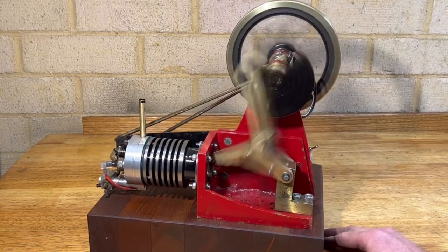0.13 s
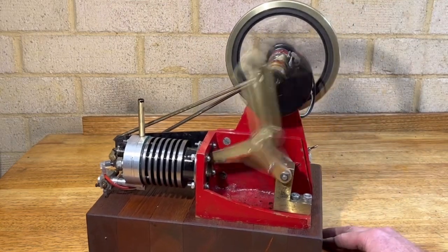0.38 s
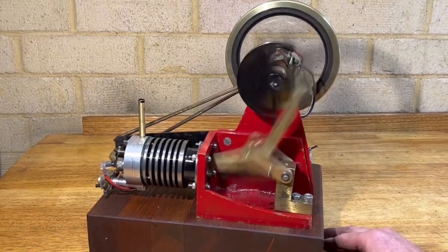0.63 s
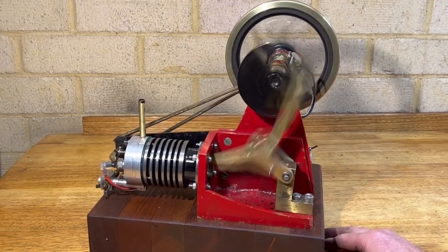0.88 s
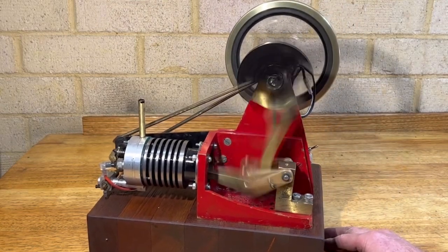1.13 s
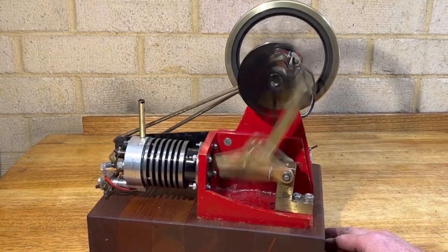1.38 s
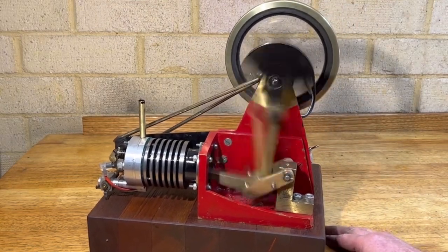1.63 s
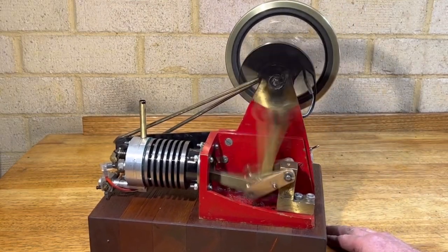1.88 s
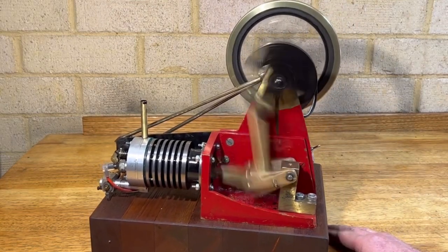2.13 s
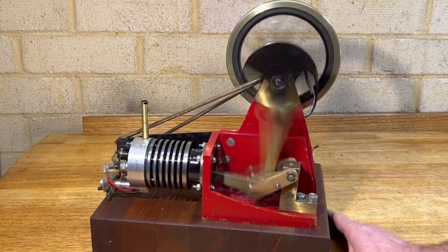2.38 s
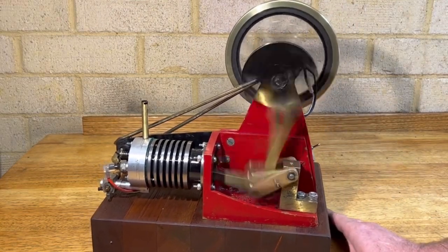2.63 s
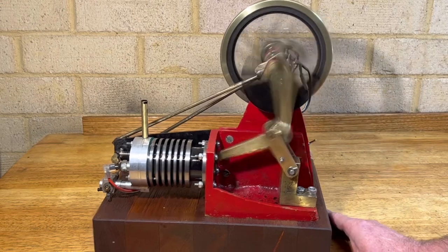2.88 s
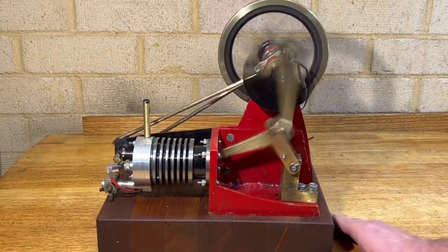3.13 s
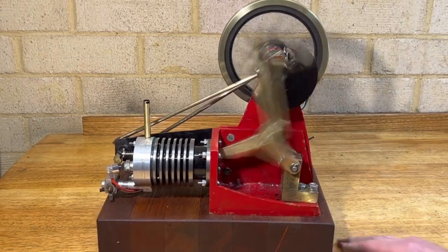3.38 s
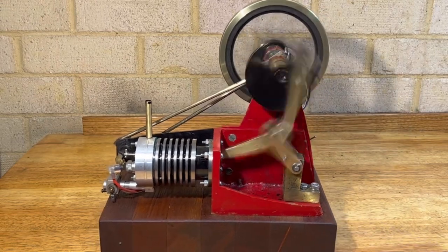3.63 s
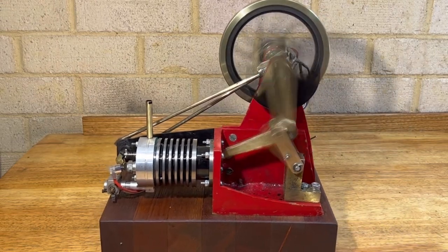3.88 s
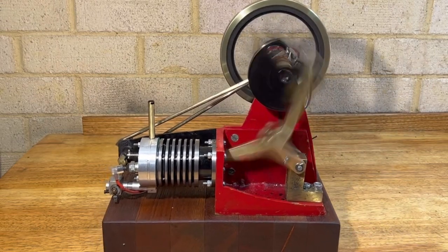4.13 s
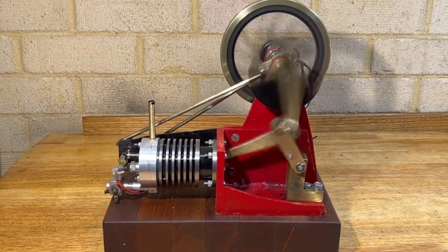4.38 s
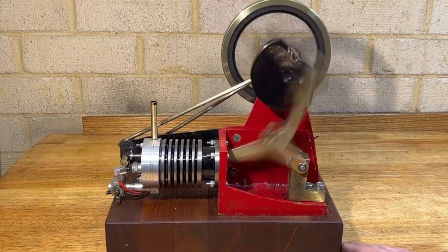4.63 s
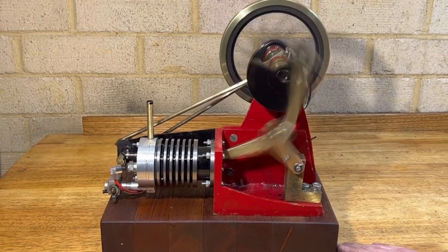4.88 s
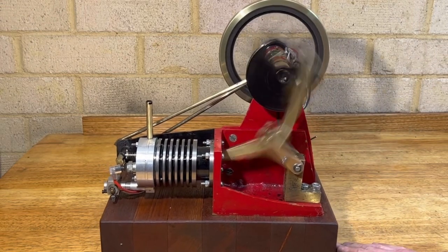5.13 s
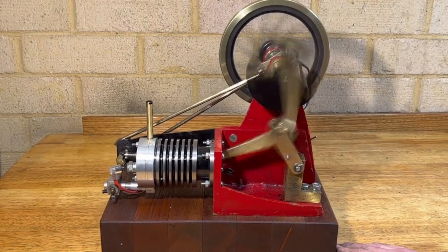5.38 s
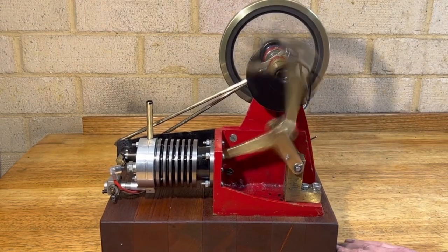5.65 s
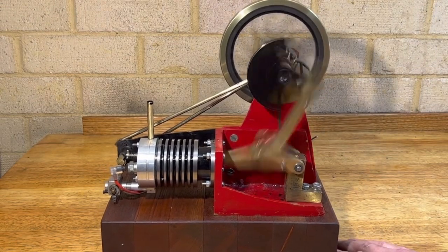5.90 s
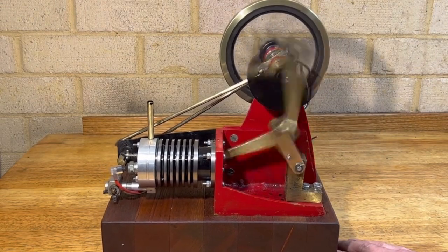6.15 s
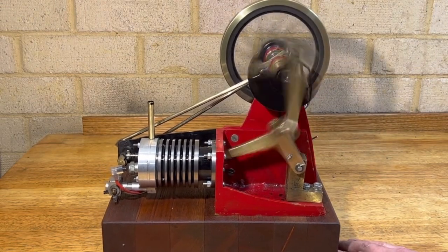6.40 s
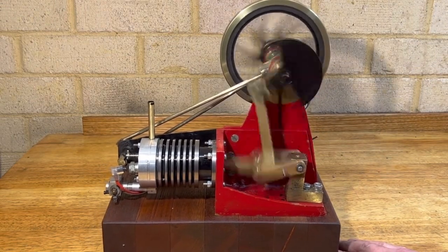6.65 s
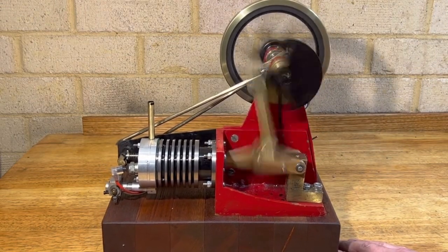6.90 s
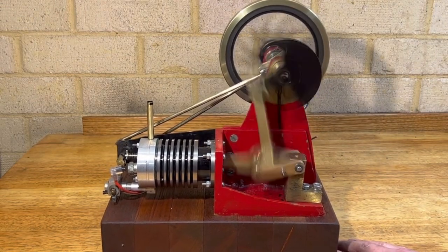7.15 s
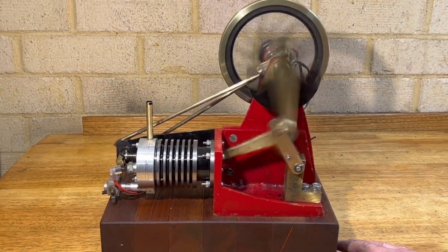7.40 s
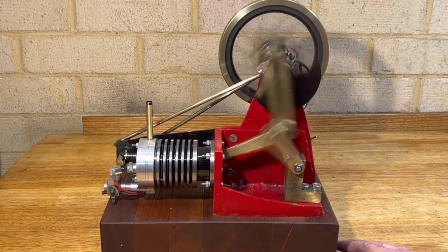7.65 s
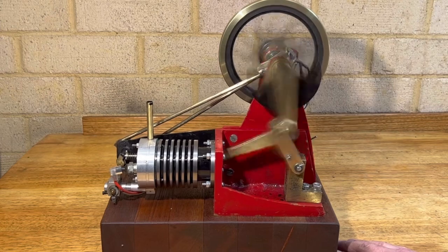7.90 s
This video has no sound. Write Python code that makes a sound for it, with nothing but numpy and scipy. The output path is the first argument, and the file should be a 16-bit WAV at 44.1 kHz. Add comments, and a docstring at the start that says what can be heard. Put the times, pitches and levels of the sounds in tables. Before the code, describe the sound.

Fast, slightly uneven clatter of a little metal engine on a wooden block: knock, tick, hiss, thud, clack, over a low bearing rumble.

```python
"""A small open-crank engine runs at about four cycles a second on a wooden block on a bench.
Each cycle starts with a rattling knock that thuds into the block; then a valve ticks open and gas hisses,
a heavy thud comes with a rush of gas, and the valve gear clacks brightly. Next the linkage knocks on its
return, a second valve ticks and hisses, and a last clack follows. Bearings rumble and the bench hums
throughout; the hum sinks until about 3 s, then partly comes back. Knocks, ticks and hiss are shaped noise."""
import sys
import numpy as np
from scipy import signal
from scipy.fft import rfft, irfft, next_fast_len
from scipy.io import wavfile

SR = 44100
rng = np.random.default_rng(int(sys.argv[2]) if len(sys.argv) > 2 else 0)


def to_linear_factor(level_db):
    """Convert decibel levels (scalar or array-like) to linear amplitude factors."""
    exponent = np.asarray(level_db, float) / 20
    return 10 ** exponent


def generate_wav(sig):
    """Save sig (samples, or channels by samples) to the path in sys.argv[1] as 16-bit PCM at SR."""
    pcm = np.round(np.clip(np.atleast_2d(sig).T, -1, 1) * 32767).astype(np.int16)
    wavfile.write(sys.argv[1], SR, pcm)


N = 353661   # length in samples
SIZE = next_fast_len(N + SR)   # spectrum length, with spare room for tails
HZ = np.fft.rfftfreq(SIZE, 1 / SR) + 1e-3   # just above zero, so that its logarithm exists

# The piston turns round twice a cycle; how hard each stroke works, against the mean:
# (t/s of the turn, thud level/dB, rattle level/dB)
STROKES = [(0.0068, -1, -0.5), (0.141, 2, 2), (0.2494, 2, 0), (0.3709, 3, 1.5), (0.4765, 0.5, 0.5),
           (0.5934, -0.0, 1.0), (0.7058, 1, 2), (0.8339, 0.5, 2.5), (0.9438, -1, 1.5), (1.0683, 0.5, 4.5),
           (1.1888, 0, 0), (1.326, -1, 1.5), (1.4393, 0.5, 1.5), (1.568, 1, 0.5), (1.6749, -2.5, 3),
           (1.7983, -0.5, -0.5), (1.9161, 0.5, 1.5), (2.0527, -1, 1.0), (2.1673, -1, 1.0), (2.2957, 0.5, 0),
           (2.4194, -3.5, 2), (2.5602, 0, -1), (2.6926, -1.5, -4), (2.85, -0.5, -1.5), (2.9763, -1, 3),
           (3.1145, -0.0, -0.5), (3.236, 0.5, -1.5), (3.3705, 0.5, 1), (3.4814, 2, -0.0),
           (3.6065, -1.5, -0.5), (3.7241, 1, -0.5), (3.863, 0.5, 1), (3.973, 1, 0.0), (4.0984, 1.5, -1.5),
           (4.2193, 1, 1), (4.3525, 0.5, 1), (4.4687, 3, 0.5), (4.6008, 1, 2), (4.7115, 2.5, 0.0),
           (4.841, 3.5, -0.5), (4.9611, 0.5, 0.5), (5.1, 0.0, 1), (5.2177, 1.5, 0.5), (5.348, 0, 1.5),
           (5.4717, 0.5, -1.0), (5.6123, 2, 1.5), (5.7278, 2.5, 0.5), (5.8567, 6, 0.5), (5.9785, 0, 0.5),
           (6.1157, -1.0, -0.5), (6.2382, -1.5, 0.5), (6.3799, 3, 0.5), (6.5097, 0, -3.0),
           (6.6636, -0.5, -1.5), (6.7838, 0.5, -0.5), (6.9232, -1.5, 2.5), (7.0326, -0.0, 0.5),
           (7.1595, 2, 1.5), (7.269, 0, 0), (7.3947, 2, 0.5), (7.504, -0.5, 0.5), (7.6313, 2.5, -1),
           (7.7537, -0.5, -1), (7.8931, 2, 0.5), (8.0095, 3, 0.5), (8.1249, 0.0, 0.0)]


def every_cycle(contact, column):
    """Times and levels of one contact: the crank passes its angle once a cycle, evenly within a stroke."""
    valve_db_per_percent = 0.17   # valve gear and gas grow louder with speed, per percent above the mean
    lead_deg = 20   # slack taken up this close before a turning point belongs to the coming stroke
    uneven_db = 1.13   # chance spread from one contact to the next
    turn_s, thud_db, rattle_db = np.transpose(STROKES)
    speed = 1 / np.gradient(turn_s)
    percent_faster = 100 * (speed / speed.mean() - 1)
    drive_db = {"thud": thud_db, "rattle": rattle_db, "speed": valve_db_per_percent * percent_faster}
    angle = contact[0] + 360 * np.arange(len(turn_s) // 2)
    times = np.interp(angle / 180, np.arange(len(turn_s)), turn_s)
    stroke = ((angle + lead_deg) // 180).astype(int)
    mean_db, follows = contact[column]
    db = mean_db + drive_db[follows][stroke]
    db = db + uneven_db * rng.standard_normal(len(angle))
    heard = times < N / SR
    return times[heard], db[heard]


# Linkage contacts in a cycle: (crank angle/deg, then for each sound (level/dB before trims, what it follows))
FIRST_KNOCK = (0.0, (-12.5, "rattle"), (-15, "thud"))   # sounds: linkage chatter, thud into the block
HEAVY_THUD = (60.5, (-16, "thud"), (-22, "speed"), (-15.0, "rattle"))   # sounds: thud, rush of gas, joint rattle
RETURN_KNOCK = (170.6, (-15.5, "rattle"), (-14, "thud"))   # sounds: linkage chatter, thud into the block
# Tone of the chatter in the first knock, in the return knock and of the duller joints: (f/Hz, level/dB)
KNOCK_COLOUR = [(1200, -3), (2200, -6.5), (3400, -2), (5500, -14.5), (9000, -20), (16000, -32)]
RETURN_COLOUR = [(1200, -11.5), (2200, -6.5), (3400, 0.5), (5500, -21), (9000, -24), (16000, -46)]
JOINT_COLOUR = [(200, -4), (500, 4), (900, 2.5), (1400, 2.5), (2000, -10), (3500, -21.5)]


def linkage():
    """Loose joints strike many times over: a short bright chatter lies on a longer dull rattle."""
    first = burst(FIRST_KNOCK, 1, KNOCK_COLOUR, 0.00044, 0.0078, t60=0.062, per_s=2700, spread_db=-2)
    first += burst(FIRST_KNOCK, 1, JOINT_COLOUR, 0.0044, 0.013, t60=0.095, per_s=3000, spread_db=-1.3)
    heavy = burst(HEAVY_THUD, 3, JOINT_COLOUR, 0.0029, 0.013, t60=0.05, per_s=3000, spread_db=2.5, trim_db=-2.5)
    heavy += burst(HEAVY_THUD, 3, KNOCK_COLOUR, 0.002, 0.013, t60=0.1, per_s=1800, spread_db=8, trim_db=-20)
    back = burst(RETURN_KNOCK, 1, RETURN_COLOUR, 0.0018, 0.0076, t60=0.044, per_s=3000, spread_db=-1)
    back += burst(RETURN_KNOCK, 1, JOINT_COLOUR, 0.0034, 0.013, t60=0.08, per_s=3000, spread_db=2.5, trim_db=-1.5)
    return first + heavy + back


# Ringing tones of the wooden block: (f/Hz, t60/s, rise/s,
# level/dB when struck by the first knock, by the heavy thud, by the return knock)
BLOCK = [(61.4, 0.21, 0.019, -50, -11.5, -19), (140.5, 0.18, 0.014, 1.5, -3.5, -8.5),
         (162, 0.09, 0.015, -22, -16, -2), (230.6, 0.14, 0.002, -12, -5, -7.5),
         (255.3, 0.081, 0.0022, -1, 2, -6), (301.4, 0.096, 0.0015, -21.5, -0.5, -12.5),
         (366.4, 0.071, 0.0026, 1.5, -16, -5), (390.8, 0.076, 0.005, 4, 9.5, 4.5),
         (476.3, 0.07, 0.0047, -3, -4.5, -6.5), (694, 0.13, 0.0029, -11, -11, -18),
         (920, 0.15, 0.0015, -22, -9, -34), (1410, 0.025, 0.001, -13, -32, -9)]


def block():
    """The wood rings in several dying tones; each blow varies their strength and pitch a little."""
    strength_db, pitch_spread = 1.7, 0.021   # chance spreads; the pitch one is a fraction
    t = np.arange(SR // 4) / SR
    out, modes = np.zeros(N + 2 * len(t)), np.array(BLOCK)
    hz, t60, rise = modes[:, :3, None].transpose(1, 0, 2)
    shape = (1 - np.exp(-t / rise)) * to_linear_factor(-60 * t / t60)
    # (contact, sound, delay/s): a knock reaches the block a little after its contact
    blows = [(FIRST_KNOCK, 2, 0.007), (HEAVY_THUD, 1, 0.001), (RETURN_KNOCK, 2, 0.009)]
    for k, (contact, column, delay) in enumerate(blows):
        for s, db in zip(*every_cycle(contact, column)):
            chance = rng.standard_normal((2, len(modes), 1))
            gain = to_linear_factor(db + modes[:, 3 + k, None] + strength_db * chance[0])
            pitch = hz * (1 + pitch_spread * chance[1])
            start = round((s + delay) * SR)
            out[start:start + len(t)] += np.sum(gain * shape * np.sin(2 * np.pi * pitch * t), axis=0)
    return rfft(out[:N], SIZE)


# Valve contacts in a cycle: (crank angle/deg, then for each sound (level/dB before trims, what it follows))
EARLY_HISS = (40.5, (-26.5, "speed"))   # sound: a valve ticks open and gas hisses
EARLY_CLACK = (96.3, (-19, "speed"), (-24, "rattle"))   # sounds: valve-gear clack, dull rattle
LATE_HISS = (223.4, (-24.5, "speed"))   # sound: as the early one
LATE_CLACK = (276.8, (-16, "speed"), (-25.5, "rattle"))   # sounds: as the early one
# Tone of the ticks, of the bright clacks and of the dull rattle under them: (f/Hz, level/dB)
TICK_COLOUR = [(1800, -26), (2800, -0.5), (3800, 5), (5000, -8.5), (8000, -22)]
CLACK_COLOUR = [(700, -35), (1500, -3), (2400, -0.5), (3600, -3), (5500, -5.5), (8500, 1.5), (12000, -3),
                (15500, -6)]
DULL_COLOUR = [(120, 6.5), (300, 15), (700, 9), (1300, 4.5), (2000, -9.5), (4000, -30)]


def valve_gear():
    """Small metal parts strike: valves tick as they open, and each clack buzzes on over a dull rattle."""
    ticks = burst(EARLY_HISS, 1, TICK_COLOUR, 0.00074, 0.002, t60=0.085, per_s=4300, spread_db=7.5)
    ticks += burst(LATE_HISS, 1, TICK_COLOUR, 0.0007, 0.0051, t60=0.065, per_s=5000, spread_db=-2)
    early = burst(EARLY_CLACK, 1, CLACK_COLOUR, 0.00068, 0.0044, t60=0.029, per_s=14000, spread_db=-2.7)
    early += burst(EARLY_CLACK, 1, CLACK_COLOUR, 0.00093, 0.021, t60=0.094, per_s=14000, spread_db=0.5,
                   trim_db=-5.5)
    early += burst(EARLY_CLACK, 2, DULL_COLOUR, 0.00066, 0.011, t60=0.099, per_s=4000, spread_db=0.5)
    late = burst(LATE_CLACK, 1, CLACK_COLOUR, 0.00067, 0.0023, t60=0.056, per_s=14000, spread_db=-1,
                 trim_db=-1.5)
    late += burst(LATE_CLACK, 1, CLACK_COLOUR, 0.00083, 0.026, t60=0.11, per_s=14000, spread_db=-0.5,
                  trim_db=-5.5)
    late += burst(LATE_CLACK, 2, DULL_COLOUR, 0.0023, 0.02, t60=0.15, per_s=3000, spread_db=1.5)
    return ticks + early + late


# Tone of the gas: early hiss, rush with the heavy thud, late hiss, swell of the late hiss: (f/Hz, level/dB)
HISS_COLOUR = [(1000, -25), (2200, -6), (3800, -0.5), (5500, -1), (8500, 0.5), (12000, -0.5), (15500, -5)]
RUSH_COLOUR = [(2200, -2), (4000, -7), (7000, -7.5), (10000, 1), (12500, 6), (15500, 0)]
LATE_HISS_COLOUR = [(1000, -8), (2200, -9), (3400, -5.5), (4600, -11.5), (6500, 0.5), (8500, -0.5),
                    (12000, 0.5), (15500, -3)]
SWELL_COLOUR = [(3500, -30), (5000, 0.5), (6400, -4), (7500, -3), (9000, -13), (11000, -24)]


def gas():
    """Gas hisses once a valve lifts, rushes with the heavy thud, swells as the late valve opens wider."""
    early = burst(EARLY_HISS, 1, HISS_COLOUR, 0.0012, 0.017, t60=0.28, per_s=15000, spread_db=2)
    rush = burst(HEAVY_THUD, 2, RUSH_COLOUR, 0.0011, 0.018, t60=0.026, per_s=15000, spread_db=3.5)
    late = burst(LATE_HISS, 1, LATE_HISS_COLOUR, 0.001, 0.0094, t60=0.24, per_s=15000, spread_db=-1)
    swell = burst(LATE_HISS, 1, SWELL_COLOUR, 0.029, 0.02, t60=0.11, per_s=14000, spread_db=2)
    return early + rush + late + swell


# Ringing tones of the metal frame, cylinder and rods: (f/Hz, width/Hz, level/dB over the plain sound)
FRAME = [(644, 19, -4.5), (987, 146, -5.5), (1140, 142, -3.5), (1373, 67, 1), (1720, 180, -3.5),
         (2064, 62, -2), (2470, 81, -11), (3230, 210, -10), (3910, 46, -17), (4330, 310, -6.5),
         (5440, 40, 2), (6350, 450, -8), (7100, 120, -30), (8440, 390, -4.5), (10630, 176, 1.5),
         (12300, 110, -23)]


def frame(spectrum, swing_db, rate):
    """The metal passes the sound and adds its ringing; impacts wander, so each tone is driven unevenly."""
    plain = irfft(spectrum, SIZE)[:, :N]
    out = plain.copy()
    for hz, width, db in FRAME:
        r = np.exp(-np.pi * width / SR)
        poles = [1, -2 * r * np.cos(2 * np.pi * hz / SR), r * r]
        zeros = [(1 - r * r) / 2, 0, (r * r - 1) / 2]   # peak gain close to 1
        drive = plain * to_linear_factor(db + swing_db * drift(rate))
        out += signal.lfilter(zeros, poles, drive)
    return rfft(out, SIZE)


# Tone of the bearing rumble, then of the bench hum: (f/Hz, level/dB, only the shape counts)
BEARINGS = [(60, -13), (100, 6.5), (230, 4), (400, 5.5), (650, -5), (1400, -9), (5000, -19.5), (9000, -21),
            (16000, -36)]
BENCH_COLOUR = [(20, -17), (42, 2), (62, 7.5), (85, -3), (120, -39)]
# Loudness of the bench hum over time: (t/s, level/dB)
BENCH_HUM = [(0, -35), (2.9, -42), (3.1, -37), (8.02, -38)]


def bearings():
    """Shaft and flywheel rumble without a pause; the bench hums below and wavers."""
    rumble_db, waver_db, waver_per_s = -32, 1, 9.0
    s, level_db = np.transpose(BENCH_HUM)
    hum_db = np.interp(np.arange(N) / SR, s, level_db) + waver_db * drift(waver_per_s)
    rumble = to_linear_factor(rumble_db) * steady(BEARINGS)
    hum = to_linear_factor(hum_db) * steady(BENCH_COLOUR)
    return rfft(rumble + hum, SIZE)


def room():
    """Walls return a dull tail of dying noise, another for each side."""
    t60_s, level_db, first_return_s = 0.17, -15.5, 0.004
    t = np.arange(SR // 2) / SR
    tail = rng.standard_normal((2, len(t))) * to_linear_factor(-60 * t / t60_s) * (t > first_return_s)
    tail = signal.lfilter([0.4], [1, -0.6], tail)   # little top
    tail = signal.lfilter([1, -1], [1, -0.93], tail)   # little bass
    energy = np.sum(tail ** 2, axis=1, keepdims=True)
    return to_linear_factor(level_db) * rfft(tail / np.sqrt(energy), SIZE)


def burst(contact, column, colour, rise, hold, t60, per_s, spread_db, trim_db=0):
    """Spectrum of many tiny impacts at every contact, coloured; rise, hold and t60 in seconds."""
    noise = envelope(contact, column, rise, hold, t60) * grains(per_s, spread_db)
    return to_linear_factor(trim_db) * rfft(noise, SIZE) * to_linear_factor(at_hz(colour))


def envelope(contact, column, rise, hold, t60):
    """Loudness over time: every event rises, holds and dies away."""
    times, db = every_cycle(contact, column)
    t = np.arange(SR // 4) / SR
    shape = (1 - np.exp(-t / rise)) * to_linear_factor(-60 * np.maximum(t - hold, 0) / t60)
    return signal.fftconvolve(clicks(times, to_linear_factor(db)), shape)[:N]


def clicks(times, gains):
    """One impulse for each event."""
    out = np.zeros(N)
    np.add.at(out, np.clip(np.round(times * SR).astype(int), 0, N - 1), gains)
    return out


def grains(per_s, spread_db):
    """Two unrelated streams of tiny impacts of uneven size, rms 1; very dense streams are hiss."""
    born = rng.random((2, N)) < per_s / SR
    size = to_linear_factor(spread_db * np.minimum(rng.exponential(1, (2, N)), 4))
    x = born * rng.standard_normal((2, N)) * size
    return x / np.sqrt(np.mean(x ** 2))


def steady(colour):
    """Two unrelated streams of unbroken coloured noise, rms 1."""
    x = irfft(rfft(rng.standard_normal((2, N)), SIZE) * to_linear_factor(at_hz(colour)), SIZE)[:, :N]
    return x / np.sqrt(np.mean(x ** 2))


def drift(rate):
    """Slow chance: unrelated values, rate of them a second, joined by straight lines."""
    knots = np.arange(0, N / SR + 1, 1 / rate)
    return np.interp(np.arange(N) / SR, knots, rng.standard_normal(len(knots)))


def at_hz(points, column=1):
    """A table read along log frequency."""
    points = np.array(points)
    return np.interp(np.log(HZ), np.log(points[:, 0]), points[:, column])


# Two microphone ports: (f/Hz, likeness 0 to 1, level/dB by which left is louder, phase/rad by which left leads)
PORTS = [(60, .97, 1.2, 0), (150, .98, 2, 0), (380, .95, -1.5, 0), (650, .68, 1, .3), (1030, .7, -.3, -.8),
         (1900, .75, 1.3, .1), (3200, .8, 1.6, .7), (5200, .55, 4, .5), (7500, .7, 2, .5)]


def scene():
    """Shared and unshared sound reach the two ports; the block radiates alike to both."""
    metal = frame(linkage() + valve_gear() + gas(), swing_db=4.5, rate=45)   # rate: new values a second
    shared, unshared = metal + bearings()
    wood = block()
    sign = np.array([[1], [-1]])   # left, right
    alike = np.clip(at_hz(PORTS, column=1), 0, 1)
    ports = np.sqrt((1 + alike) / 2) * shared + np.sqrt((1 - alike) / 2) * unshared * sign + wood
    ports = ports * to_linear_factor(sign * at_hz(PORTS, column=2) / 2)
    ports = ports * np.exp(0.5j * sign * at_hz(PORTS, column=3))
    return irfft(ports + room() * (shared + wood), SIZE)[:, :N]


def top_cut(x):
    """Nothing passes above the cut-off."""
    return signal.sosfilt(signal.butter(12, 17000, fs=SR, output="sos"), x)


def record(dry):
    """Peaks are rounded, both ends cut; the top treble is one signal for both sides, the left one lagging."""
    ceiling, rumble_cut_hz, cutoff_hz = 0.64, 24, 15800
    treble_hz, lag_s, in_step_hz, dwell_rad = 7660, 0.000277, 8370, 0.3
    both = rfft(ceiling * np.tanh(dry / ceiling), SIZE)
    sign = np.array([[1], [-1]])   # left, right
    high = 1 / (1 + (treble_hz / HZ) ** 24)
    turn = 2 * np.pi * (HZ - in_step_hz) * lag_s
    # the phase between the sides lingers in step and in opposition
    lag = np.exp(-0.5j * sign * (turn - dwell_rad * np.sin(2 * turn)))
    edges = 1 / (1 + (rumble_cut_hz / HZ) ** 2) / (1 + (HZ / cutoff_hz) ** 300)
    joined = (1 - high) * both + high * both.mean(axis=0) * lag
    mix = irfft(edges * joined, SIZE)[:, :N]
    return top_cut(mix)


dry = scene()
out = record(dry)
generate_wav(out)
```